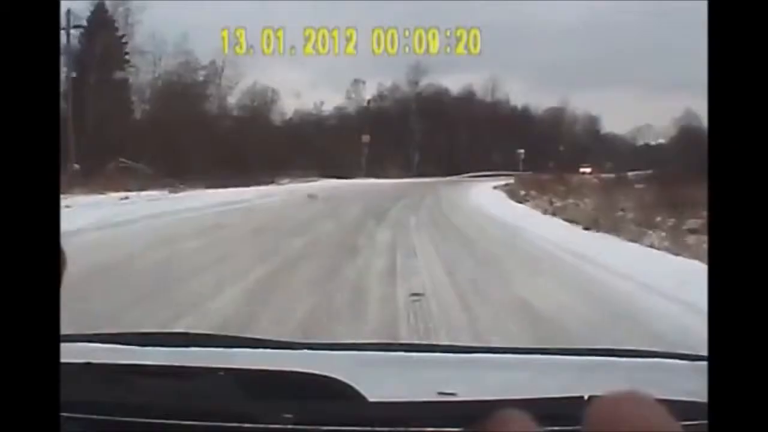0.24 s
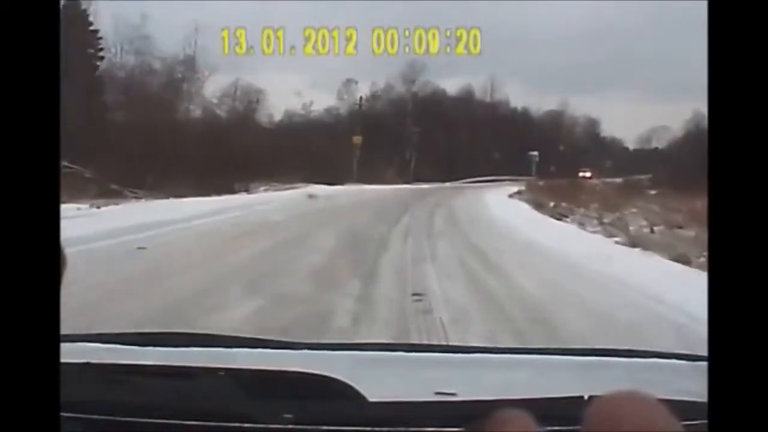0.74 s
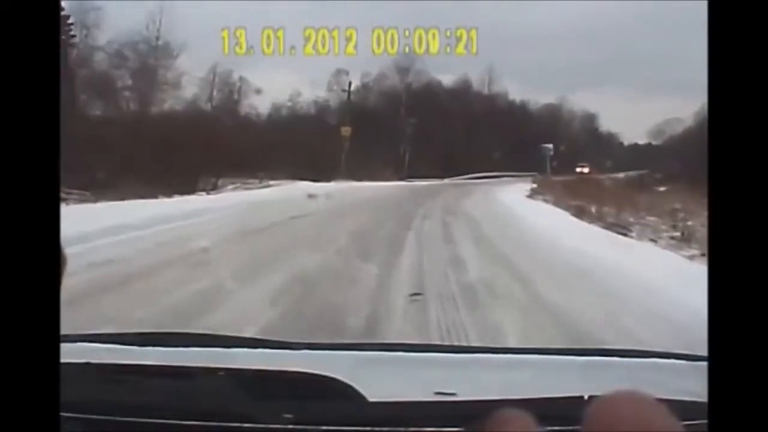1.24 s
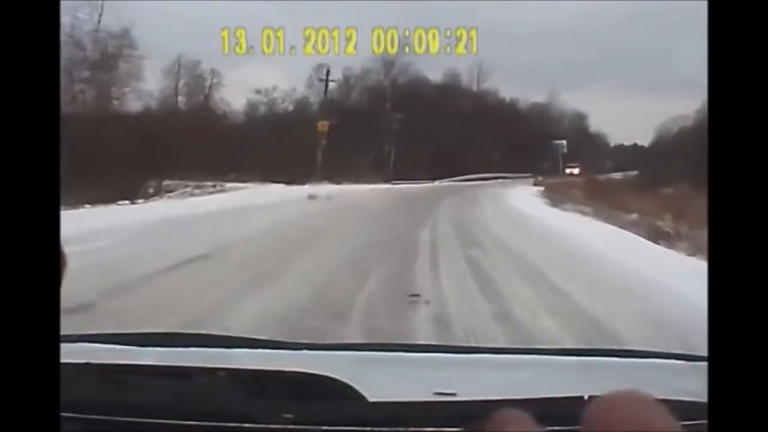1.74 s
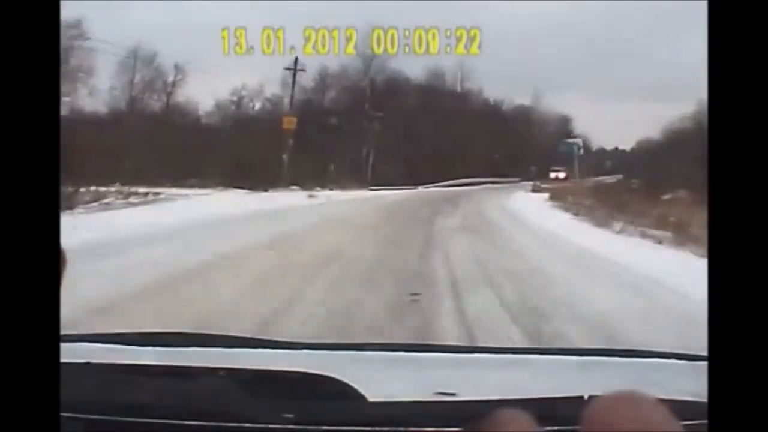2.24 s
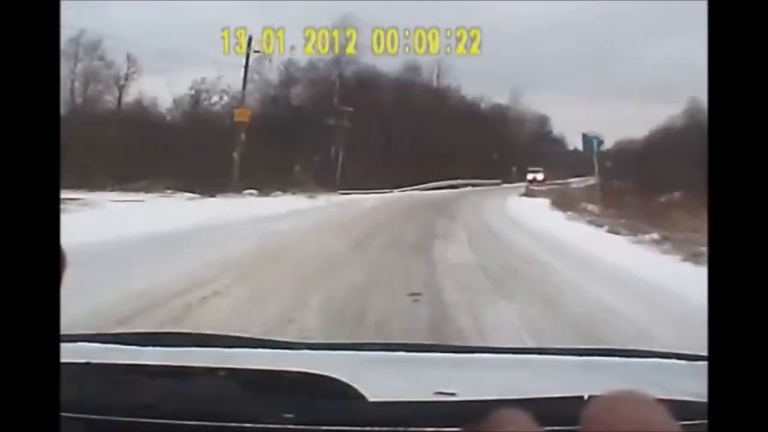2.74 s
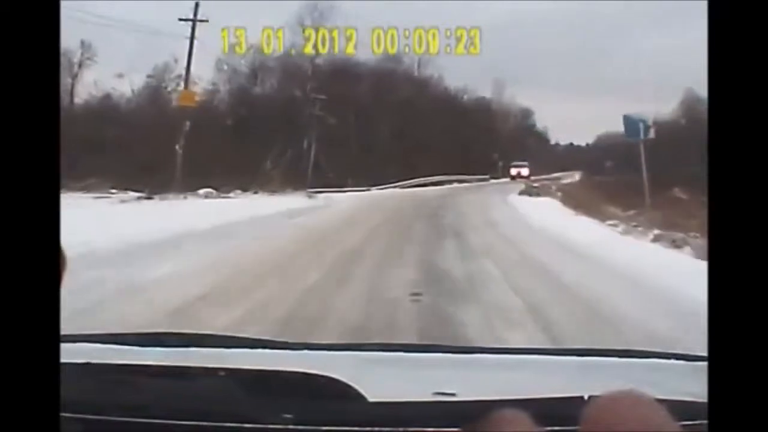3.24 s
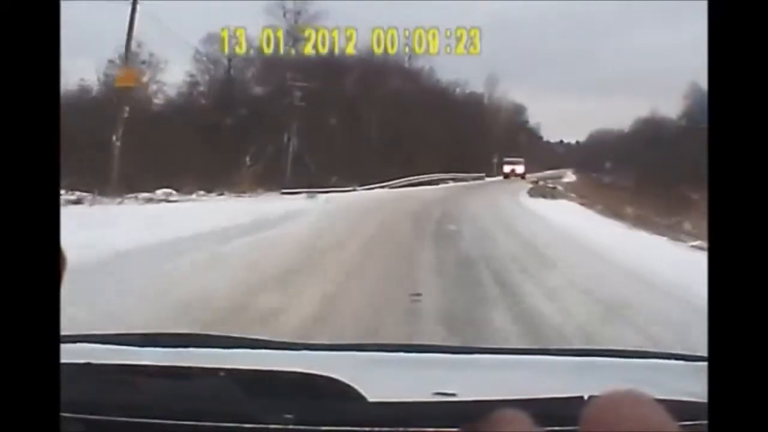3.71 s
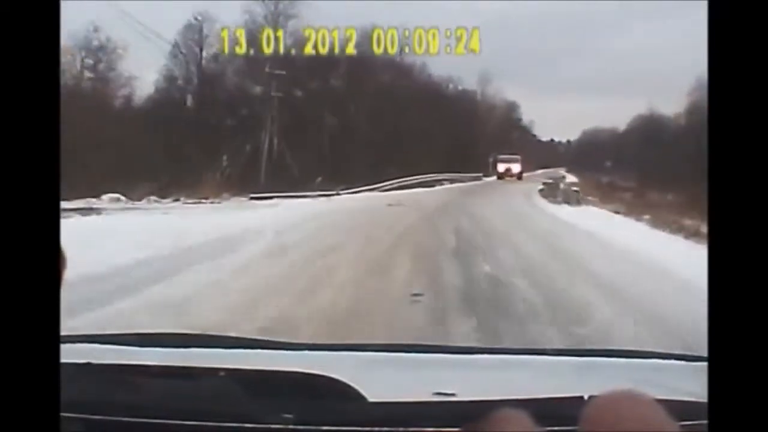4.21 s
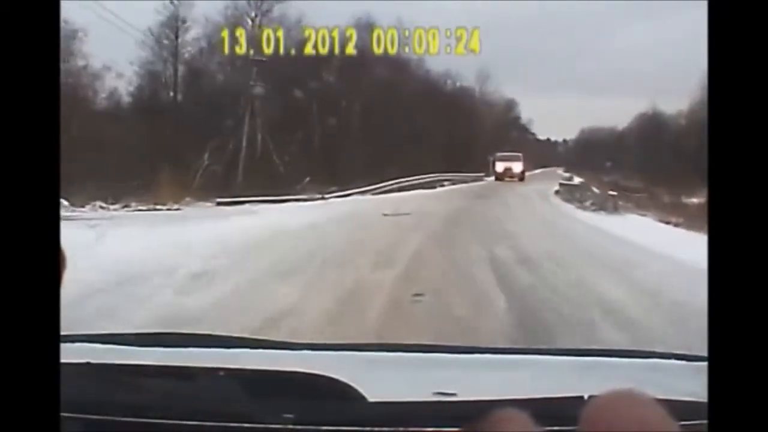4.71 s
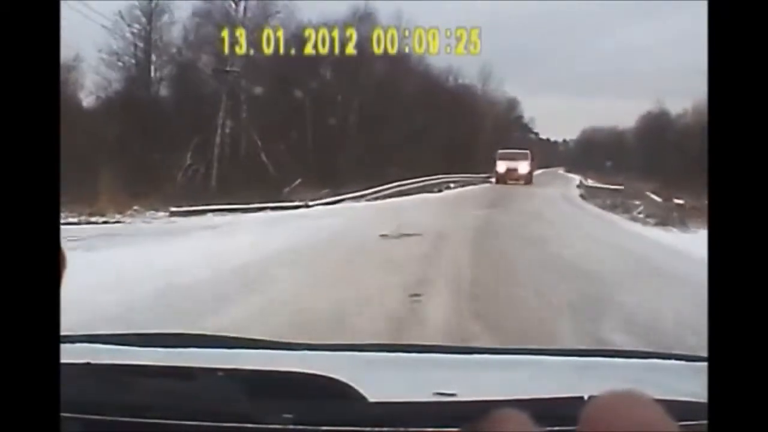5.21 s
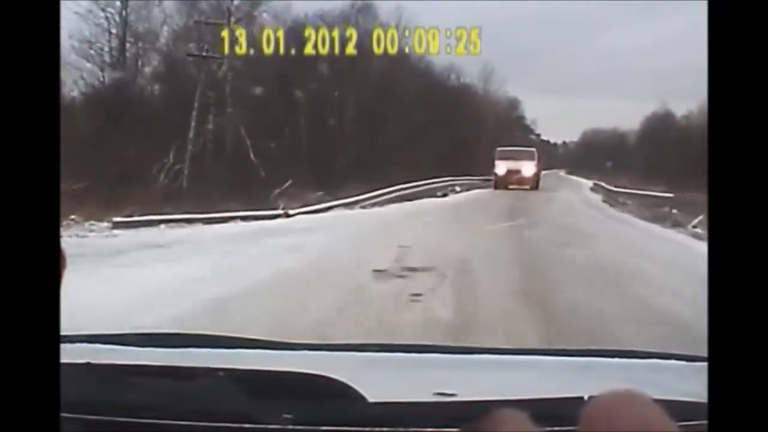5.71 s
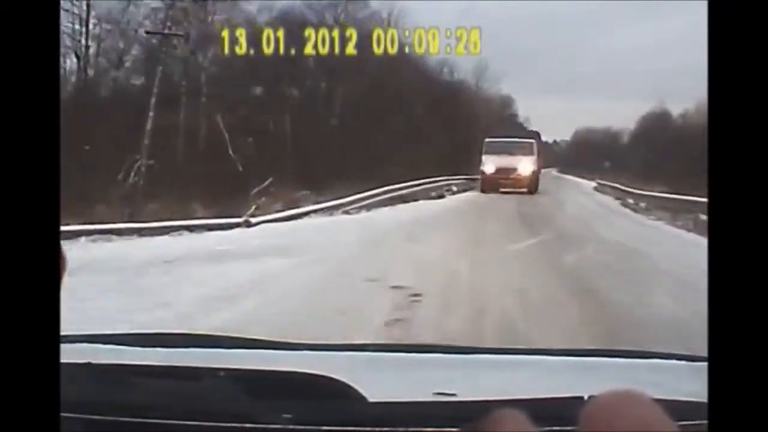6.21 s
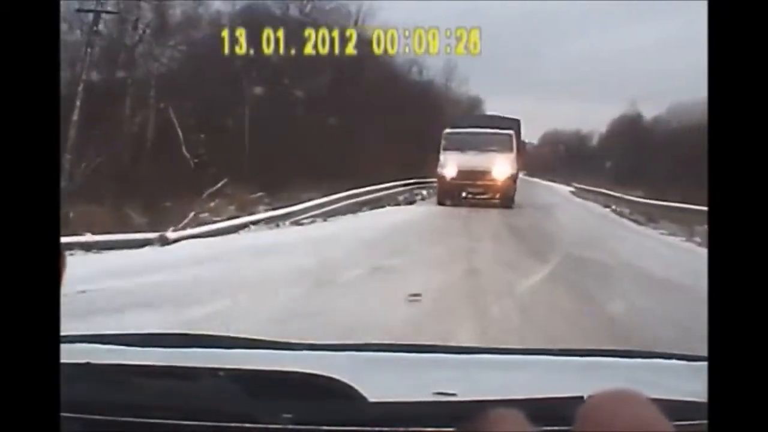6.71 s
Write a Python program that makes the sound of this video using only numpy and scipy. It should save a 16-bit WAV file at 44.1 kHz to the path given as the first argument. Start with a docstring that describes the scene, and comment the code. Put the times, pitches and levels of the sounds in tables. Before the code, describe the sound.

A car idles softly for a moment. At about 0.4 seconds a thud cuts to the inside of another car driving on packed snow: a low engine drone, booming cabin air and a steady tyre roar, with faint microphone hiss and a thin electronic whine. Ruts thump the floor around 0.7 and 1.4 seconds, and loose trim ticks lightly.

At about 3.4 seconds the tyres begin to scrub and crunch under braking, strongest from 4 to 5.5 seconds. The trim buzzes and clicks, cloth swishes in short strokes, and more ruts thump from 4 seconds on. Between 5 and 5.6 seconds come several short, low swells of cabin boom. Hollow knocks and sharp ticks land at 6 seconds and cluster from 6.6 to 6.9 seconds as the tyre noise eases. The loudest peaks are clipped and slightly distorted.

```python
"""Idling, then driving on snow

A quiet car idles for a moment, then the scene cuts to the inside of a car on packed snow.
Ruts thump the floor, the cabin air booms, and the tyres roar, then scrub under braking.
Loose trim ticks and buzzes, and cloth swishes. Late on come short swells of cabin boom near
290 Hz, followed by hollow knocks. The second car's microphone signal sits far below zero,
so its downward peaks are clipped flat."""
import sys
import numpy as np
from scipy import signal
from scipy.fft import rfft, irfft, next_fast_len
from scipy.io import wavfile
from scipy.ndimage import uniform_filter1d

SR = 44100
rng = np.random.default_rng(int(sys.argv[2]) if len(sys.argv) > 2 else 0)


def digitize_waveform(pressure):
    """Quantize a signal to 16-bit integers and store it at the path in sys.argv[1].

    Rows of a 2-D input are taken as channels; values are limited to [-1, 1].
    """
    field = np.atleast_2d(pressure).T
    bounded = np.clip(field, -1, 1)
    quanta = np.round(bounded * 32767).astype(np.int16)
    wavfile.write(sys.argv[1], SR, quanta)


N = 306495
TIME = np.arange(N) / SR
CUT_S = 0.38151  # the second car takes over

# Tone colours, how strong each pitch is compared with the others: f/Hz, level/dB
HISS_COLOUR = [(1290, -36), (2200, -8), (3150, -3), (3590, 1), (4230, -3.5), (5910, -2.5), (8060, -5),
               (8800, -6), (9000, 3), (9260, -0.5), (10100, -6), (12400, -12), (14900, -37), (15500, -43)]  # microphone hiss
IDLE_COLOUR = [(14, -45), (25, 5), (85, -5.5), (190, -17), (510, -29.5), (820, -31.5), (1650, -52),
               (2400, -49), (3200, -57.5), (7000, -63.5), (15500, -65), (16500, -90)]  # the idling car
ENGINE_COLOUR = [(62, -45), (105, -9.5), (135, 1.5), (149, -2), (167, -9), (200, -7.5), (260, -6.5),
                 (440, -120)]  # engine and exhaust while driving
SHAKE_COLOUR = [(14, -40), (24, -13), (35, 0), (48, -3), (61, -14), (78, -9), (110, -14), (140, -40)]  # suspension and floor
BOOM_COLOUR = [(100, -36), (170, -23), (205, -12.5), (291, 2.5), (398, -5), (446, -5.5), (489, -31),
               (520, -13.5), (680, -30), (1140, -120)]  # cabin air
BUZZ_COLOUR = [(1350, 3), (2300, -2), (2970, -4), (3600, 3), (5060, -11.5), (5930, -10), (7820, -16),
               (9290, -14), (12000, -22), (15600, -55)]  # loose trim
DULL_SWISH_COLOUR = [(2200, -16), (3000, -11), (3600, -3.5), (4300, -17), (5200, -16)]  # lower part of a swish
BRIGHT_SWISH_COLOUR = [(2710, -39), (4600, -7.5), (5940, 0.5), (7260, -14), (8230, -6.5), (10500, -11),
                       (13600, -28)]  # upper part of a swish
ROLL_COLOUR = [(280, -86), (470, 5), (494, -12), (587, 0.5), (748, 1), (1050, -6), (1750, -24),
               (1860, -29.5), (2600, -34), (3380, -40), ]  # rolling tyres
SCRUB_COLOUR = [(280, -37), (470, -7.5), (508, -17.5), (703, -7.5), (895, 0.5), (1220, -1.5), (1460, -11),
                (1730, -15), (1850, -19.5), (2730, -29.5), (3900, -45), (6600, -120)]  # sliding tyres

# Loudness over time: t/s, level/dB
IDLE_LEVELS = [(0.0, -23.5), (0.34, -30), (0.36, -25)]  # the idling car
ENGINE_LEVELS = [(.4, -33.5), (2.5, -34.5), (4.5, -32.5), (5.7, -39.5), (6.1, -31), (6.9, -36.5)]  # engine and exhaust while driving
SHAKE_LEVELS = [(.4, -27.5), (2.9, -27), (3.7, -24), (5.1, -24), (5.5, -23), (6.9, -23)]  # shaking from the road
BOOM_LEVELS = [(.4, -30.5), (4.8, -31.5), (5.4, -34.5), (6.9, -31.5)]  # cabin boom before the tyres add to it
BUZZ_LEVELS = [(3.35, -55.5), (4.19, -43), (5.01, -46.5), (5.3, -40.5), (5.68, -46.5), (6.92, -48.5)]  # loose trim during the slide
# Tyres on snow: t/s, rolling level/dB, sliding level/dB
TYRE_LEVELS = [(.4, -32.5, -39), (3.15, -35.5, -41.5), (3.345, -37, -35.5), (3.355, -30.5, -28),
               (3.41, -36, -28), (3.46, -53, -24.5), (3.62, -43, -26), (3.85, -36.5, -28),
               (4.08, -42, -21.5), (4.33, -29, -27), (4.55, -35, -21.5), (4.75, -31, -26),
               (5.3, -30, -25.5), (5.75, -27, -28.5), (6.03, -29.5, -29.5), (6.15, -32.5, -32),
               (6.5, -36.5, -33.5), (6.9, -37.5, -35.5)]

# Tones from the electronics in each car: f/Hz, level/dB
IDLE_WHINE = [(7870, -69.5)]
DRIVING_WHINE = [(8441, -63.5), (12000, -86)]
# Notes at which the body panels ring: f/Hz, width/Hz, gain/dB
PANEL_NOTES = [(276, 5.7, -0.5), (713, 4.4, -6.5), (869, 5.6, 4), (1037, 12, 3.5), (1251, 14, 3),
               (1533, 9.2, 5.5), (1731, 9.6, 7.5), (2020, 8, 10.5)]
# Faint touches of the trim: t/s, level/dB
TRIM_TOUCHES = [(.765, -38), (.943, -36), (1.1935, -29), (1.478, -38), (3.396, -33), (3.825, -27.5)]
# Trim ticks: t/s, level/dB, then relative to that level: bright/dB, body/dB, rebound/dB, snap/dB
TRIM_TICKS = [(0.527, -26, -5, 5.5, -2, -6), (0.795, -32.5, -1, 14.5, 5, 2), (1.023, -27.5, -6, 10, 0, 9),
              (1.1321, -28.5, -16, 10, -7, 7.5), (1.183, -33.5, -28, 11, -12, 2),
              (1.2052, -19, 1, 7.5, -9, -12), (3.3723, -26, -10, 5, -12, 4), (3.96, -27, -2, 12, -10, 4),
              (3.9848, -27, 3, 9, -5, 7), (4.013, -27, 3, 12, 2, 5), (4.033, -29, -14, 6, -2, 2),
              (4.06, -25, -2, 5, -13, -8), (4.083, -16, -3, -5, -15, -1), (4.108, -24, 2, 8, -20, -8),
              (4.111, -24.5, -3, 8, -22, 4), (4.1587, -26, 1, -4, -20, 7),
              (4.233, -27.5, -27, 18.5, -20, -3), (4.3177, -31, -20, 6, -16, 1),
              (4.552, -22.5, -28, 8, -23, 4), (4.813, -33, -18, 15, -17, 2), (5.333, -35, 4, 18, -15, 2),
              (5.988, -20, -2, 3, -4, -10), (6.025, -29.5, -8, 15, -15, -2), (6.244, -36, -8, 15, -15, 2),
              (6.5921, -20.5, 4.5, -7, -16, -17), (6.6528, -15.5, -18, 5, -24, 2),
              (6.771, -30.5, -23, 7, -17, -4), (6.862, -23.5, -30, 4, -19, 5)]
# Strokes over a panel: start t/s, length/s, dull level/dB, bright level/dB
SWISHES = [(4.074, 0.049, -35.5, -47), (4.307, 0.053, -47, -47), (4.544, 0.032, -36, -69),
           (5.037, 0.11, -43.5, -52), (5.143, 0.04, -36.5, -50), (5.204, 0.085, -51, -41),
           (5.313, 0.059, -47, -52), (5.976, 0.073, -40, -44.5), (6.16, 0.11, -49, -51),
           (6.391, 0.045, -42.5, -48), (6.602, 0.074, -37.5, -37), (6.671, 0.081, -46, -43)]
# Short swells of cabin boom near 290 Hz, then hollow knocks from 6 s on: t/s, level/dB, f/Hz
SWELLS_AND_KNOCKS = [(4.345, -15, 295), (5.062, -16, 300), (5.196, -10.5, 300), (5.24, -16, 296),
                     (5.373, -10, 284), (5.451, -8.5, 293), (5.551, -15, 285), (6.017, -14.5, 567),
                     (6.029, -18.5, 92.6), (6.275, -21, 91), (6.6522, -7.5, 1855), (6.654, -15, 890),
                     (6.732, -26, 313), (6.748, -17, 220), (6.779, -11.5, 353), (6.797, -13.5, 313),
                     (6.8, -23.5, 73), (6.856, -21.5, 597), (6.865, -12.5, 715)]
# Ruts hitting the floor: t/s, level/dB
RUTS = [(.72, -16.5), (1.392, -18), (4.067, -10.5), (4.468, -11.5), (4.551, -10.5), (5.771, -12),
        (6.021, -10.5), (6.188, -13), (6.6, -11)]


def from_db(db):
    """Turn decibels into a factor to multiply by."""
    return 10 ** (np.asarray(db) / 20)


def loudness(rows):
    """Join a table's points into one gain curve for each level column."""
    times, *columns = np.transpose(rows)
    return [from_db(np.interp(TIME, times, db)) for db in columns]


def rms_one(x):
    """Scale a signal so that its average power is 1."""
    return x / np.sqrt(np.mean(x ** 2) + 1e-20)


def drift(rate_hz):
    """A smooth random wobble of size about 1, mostly slower than rate_hz."""
    step = 40  # samples between wobble points
    r = np.exp(-2 * np.pi * rate_hz * step / SR)
    slow = signal.lfilter([1], [1, -2 * r, r * r], rng.standard_normal(N // step + 2002))[2000:]
    return np.interp(np.arange(N) / step, np.arange(len(slow)), rms_one(slow))


def coloured(x, colour):
    """Give a signal a tone colour, at power 1."""
    size = next_fast_len(N)
    hz, db = np.transpose(colour)
    bins_hz = np.arange(size // 2 + 1) * SR / size + 1
    gain = from_db(np.interp(np.log(bins_hz), np.log(hz), db, left=-120, right=-120))
    return rms_one(irfft(rfft(x, size) * gain, size)[:N])


def noise(colour, flicker_db, rate_hz):
    """Coloured noise whose level flickers."""
    return coloured(rng.standard_normal(N) * from_db(flicker_db * drift(rate_hz)), colour)


def grains(per_s, spread_db):
    """Random clicks of uneven size and sign."""
    sizes = from_db(spread_db * np.minimum(rng.exponential(1, N), 5)) * rng.choice([-1, 1], N)
    return sizes * (rng.random(N) < per_s / SR)


def clicks(times, db):
    """One-sample clicks at the given times and levels."""
    out = np.full(N, 1e-18)  # not quite zero, which keeps the filters fast
    out[np.round(times * SR).astype(int)] = from_db(db)
    return out


def fade(hits, t60):
    """Give each click a tail that falls by 60 dB in t60 seconds."""
    return signal.lfilter([1], [1, -from_db(-60 / (t60 * SR))], hits)


def ring(hits, hz, t60):
    """Each click starts a tone that falls by 60 dB in t60 seconds."""
    r, angle = from_db(-60 / (t60 * SR)), 2 * np.pi * hz / SR
    return signal.lfilter([0, np.sin(angle)], [1, -2 * r * np.cos(angle), r * r], hits + 1e-18)


def soft_note(t, db, hz, t60):
    """One fading note; taking away a shorter ring softens its start."""
    hit = clicks(t, db)
    return ring(hit, hz, t60) - ring(hit, hz, t60 * 0.068)


def band(x, low_hz, high_hz):
    """Keep the pitches between two limits."""
    return signal.sosfilt(signal.butter(2, [low_hz, high_hz], "band", fs=SR, output="sos"), x)


def panels(x):
    """Body panels lift or lower narrow bands of the sound passing through; the result has power 1."""
    out = x.copy()
    for hz, width_hz, gain_db in PANEL_NOTES:
        r = np.exp(-np.pi * width_hz / SR)
        feedback = [1, -2 * r * np.cos(2 * np.pi * hz / SR), r * r]
        note = (1 - r * r) / 2 * signal.lfilter([1, 0, -1], feedback, x)
        out += (from_db(gain_db) - 1) * note
    return rms_one(out)


def hiss():
    """The microphone's own faint noise."""
    return from_db(-51.5) * noise(HISS_COLOUR, flicker_db=0.86, rate_hz=20)


def whine(tones):
    """Electronics give off thin tones that waver a little in level."""
    return sum(from_db(db + 0.61 * drift(9.9)) * np.sqrt(2) * np.sin(2 * np.pi * hz * TIME)
               for hz, db in tones)


def idling_car():
    """The first car: a soft low rumble, a whine and one faint tick."""
    rumble = loudness(IDLE_LEVELS)[0] * noise(IDLE_COLOUR, flicker_db=0.57, rate_hz=11)
    tick = ring(clicks(0.1225, db=-41), hz=1900, t60=0.006)
    return rumble + whine(IDLE_WHINE) + tick


def trim_chatter():
    """Faint touches make the trim ring, some at set times and some at random early on."""
    stray = from_db(-52) * grains(per_s=15, spread_db=5) * (TIME < 1.25)
    placed = clicks(*np.transpose(TRIM_TOUCHES))
    return ring(stray, hz=3450, t60=0.019) + ring(placed, hz=3360, t60=0.0084)


def trim_buzz():
    """Loose trim buzzes with the slide, in clumps of tiny clicks."""
    level = loudness(BUZZ_LEVELS)[0] * (TIME > BUZZ_LEVELS[0][0])
    clumps = grains(per_s=6000, spread_db=-2) * from_db(2.9 * drift(14))
    return level * coloured(clumps, BUZZ_COLOUR)


def swishes():
    """Cloth or grit drags over a panel; the rubbing swells and fades with each stroke."""
    dull = noise(DULL_SWISH_COLOUR, flicker_db=3, rate_hz=190)
    bright = noise(BRIGHT_SWISH_COLOUR, flicker_db=3.4, rate_hz=100)
    out = np.zeros(N)
    for start, length, dull_db, bright_db in SWISHES:
        stroke = np.sin(np.pi * np.clip((TIME - start) / length, 0, 1)) ** 0.5
        out += stroke * (from_db(dull_db) * dull + from_db(bright_db) * bright)
    return out


def trim_ticks():
    """Trim cracks in three bands, snaps as the contact lets go, then rings on the rebound."""
    times, db, bright_db, body_db, rebound_db, snap_db = np.transpose(TRIM_TICKS)
    cracks = np.zeros(N)
    bands = [(3080, 4480, 0.02, 0), (5060, 8250, 0.012, bright_db), (1010, 1700, 0.01, body_db)]
    for low_hz, high_hz, t60, extra_db in bands:
        hits = clicks(times, db + extra_db)
        swell = fade(hits, t60) - fade(hits, t60 * 0.33)  # the contact builds up, then dies away
        make_up = np.sqrt(SR / 2 / (high_hz - low_hz))  # restores the power the filter removes
        cracks += make_up * band(swell * rng.standard_normal(N), low_hz, high_hz)
    low_hz, high_hz = 930, 4930
    releases = -clicks(times + 0.001515, db + snap_db)
    snaps = band(releases, low_hz, high_hz) * SR / 2 / (high_hz - low_hz)
    rebounds = clicks(times + 0.0034, db + rebound_db)
    trim_hz, trim_t60 = 4370, 0.019
    ringing = ring(rebounds, trim_hz, trim_t60) - ring(rebounds, trim_hz, trim_t60 * 0.44)
    return cracks + snaps + ringing


def boom_swells_and_knocks():
    """Short swells of cabin boom, then hollow knocks, each roughened by a higher note; one thin ping."""
    cycles = 32.5  # swings a note takes to fall by 60 dB
    higher = [(t, db - 15.5, hz * 1.256) for t, db, hz in SWELLS_AND_KNOCKS]
    ping = soft_note(6.026, db=-29.5, hz=9250, t60=0.07)
    return ping + sum(soft_note(t, db, hz, t60=cycles / hz) for t, db, hz in SWELLS_AND_KNOCKS + higher)


def engine():
    """Engine and exhaust drone low while driving."""
    return loudness(ENGINE_LEVELS)[0] * noise(ENGINE_COLOUR, flicker_db=0.12, rate_hz=17)


def floor_rumble():
    """The rough road shakes the suspension, and ruts thump the floor."""
    shake = loudness(SHAKE_LEVELS)[0] * noise(SHAKE_COLOUR, flicker_db=0.72, rate_hz=21)
    return shake + sum(soft_note(t, db, hz=40.6, t60=0.51) for t, db in RUTS)


def cabin_boom(roll, slide):
    """The cabin air booms, more strongly as the tyres get louder."""
    power = loudness(BOOM_LEVELS)[0] ** 2 + (from_db(1.5) * roll) ** 2 + (from_db(-6) * slide) ** 2
    return np.sqrt(power) * panels(noise(BOOM_COLOUR, flicker_db=1.15, rate_hz=9.6))


def rolling_tyres(roll):
    """Tyres roar on packed snow, heard through the body panels."""
    return roll * panels(noise(ROLL_COLOUR, flicker_db=1.44, rate_hz=36))


def sliding_tyres(slide):
    """Snow crunches under the sliding treads, brighter as they first dig in."""
    crunch = grains(per_s=4000, spread_db=0.9) * from_db(0.84 * drift(27))
    scrub = panels(coloured(crunch, SCRUB_COLOUR))
    digging_in = uniform_filter1d(((TIME > 3.36) & (TIME < 3.66)).astype(float), size=800)
    treble = signal.sosfilt(signal.butter(2, 1250, "high", fs=SR, output="sos"), scrub)
    return slide * (scrub + (from_db(3) - 1) * digging_in * treble)


def scene():
    """The idling car until the cut, then the car on snow, in one channel."""
    roll, slide = loudness(TYRE_LEVELS)
    background = hiss() + whine(DRIVING_WHINE)
    inside = trim_chatter() + trim_buzz() + swishes() + trim_ticks() + boom_swells_and_knocks()
    body = engine() + floor_rumble() + cabin_boom(roll, slide)
    tyres = rolling_tyres(roll) + sliding_tyres(slide)
    return np.where(TIME < CUT_S, idling_car(), background + inside + body + tyres)[None]


def record(dry):
    """At the cut the signal drops off centre with a thud; its lowest peaks clip and top treble is cut."""
    offset, lower_limit, cutoff_hz = -0.62, -0.975, 15800
    bend = 0.1 * (dry ** 2 - np.mean(dry ** 2))  # lopsided amplifier: upswings shrink, downswings grow
    shifted = dry + (TIME >= CUT_S) * (offset - bend)
    clipped = np.maximum(shifted, lower_limit)
    return signal.sosfilt(signal.cheby2(12, 70, cutoff_hz, fs=SR, output="sos"), clipped)


dry = scene()
out = record(dry)
digitize_waveform(out)
```